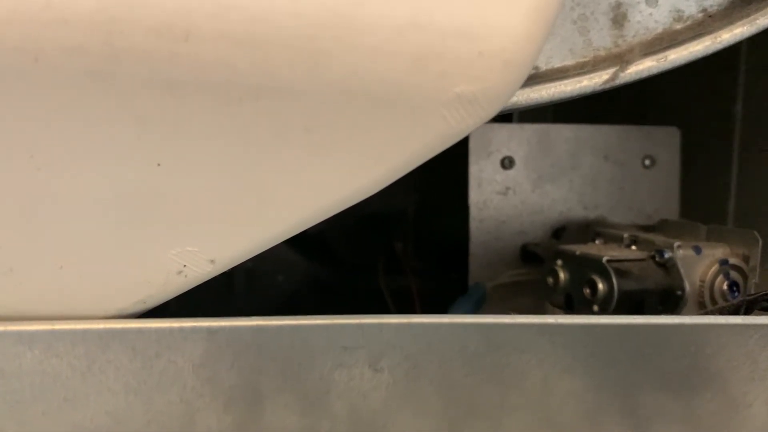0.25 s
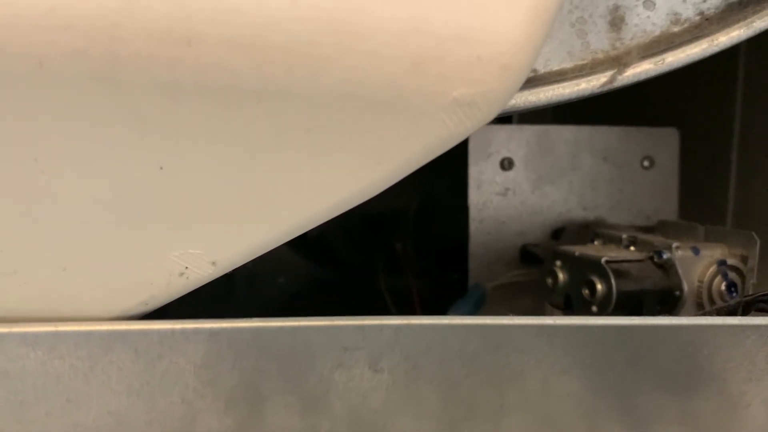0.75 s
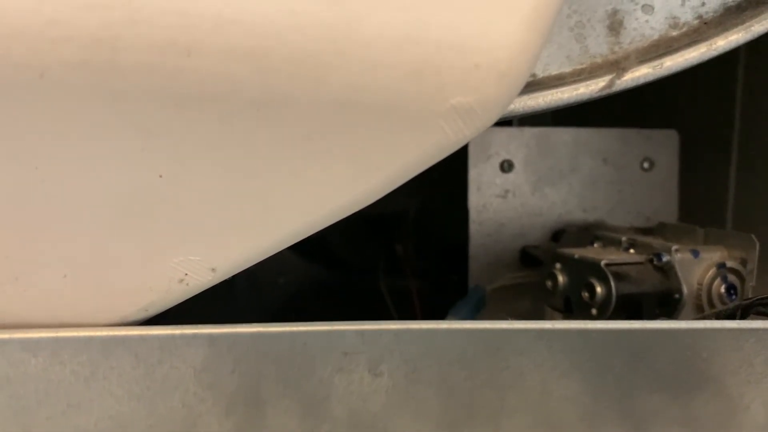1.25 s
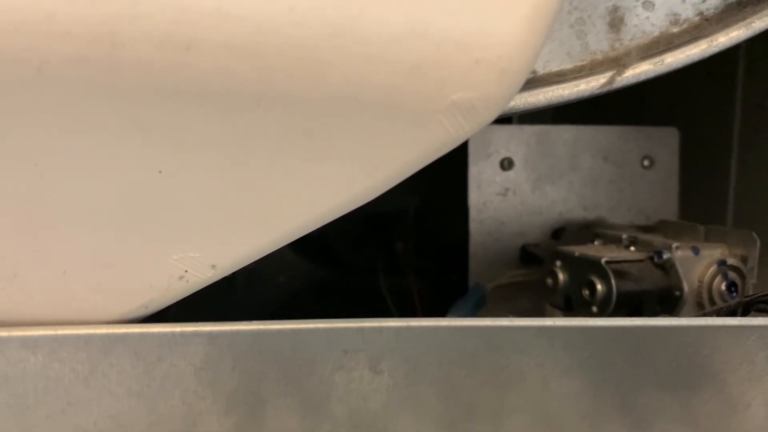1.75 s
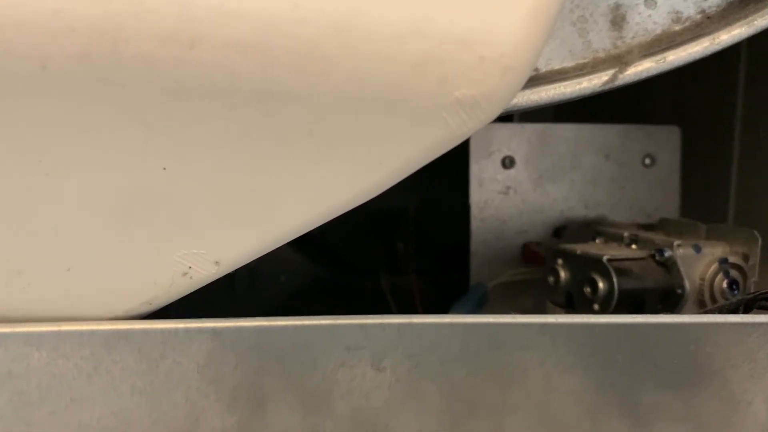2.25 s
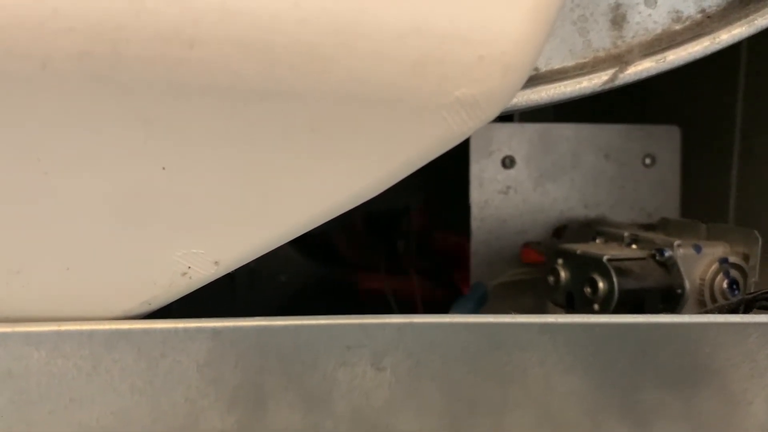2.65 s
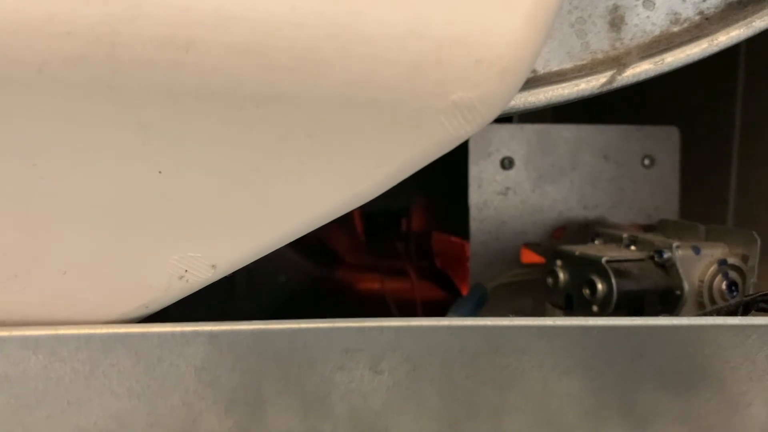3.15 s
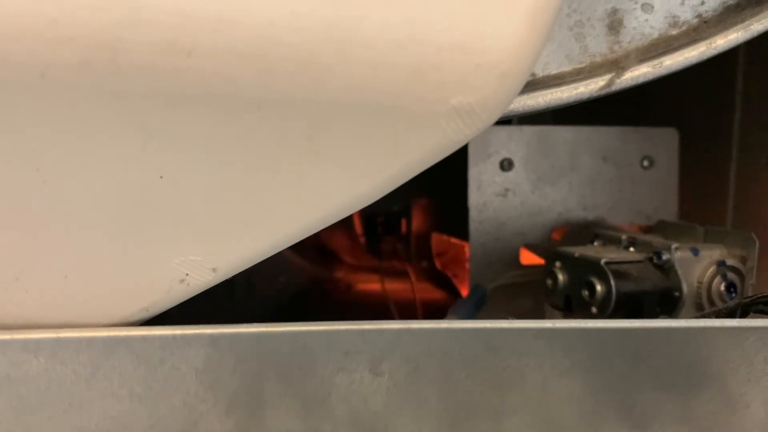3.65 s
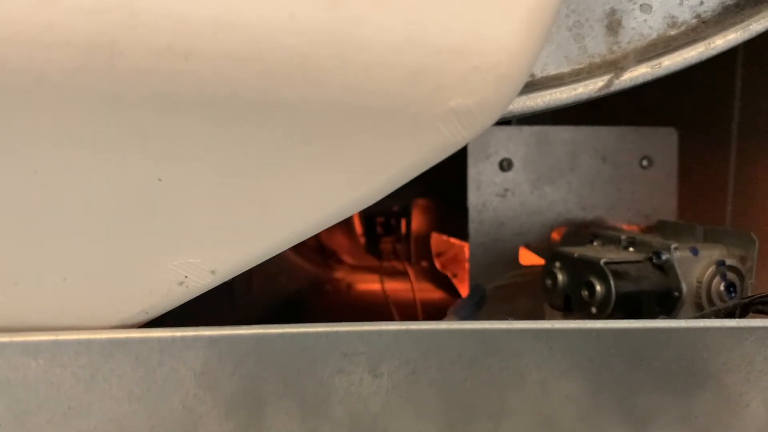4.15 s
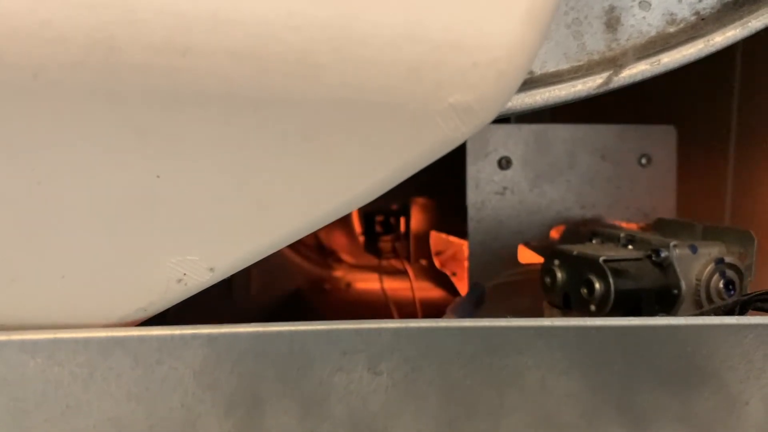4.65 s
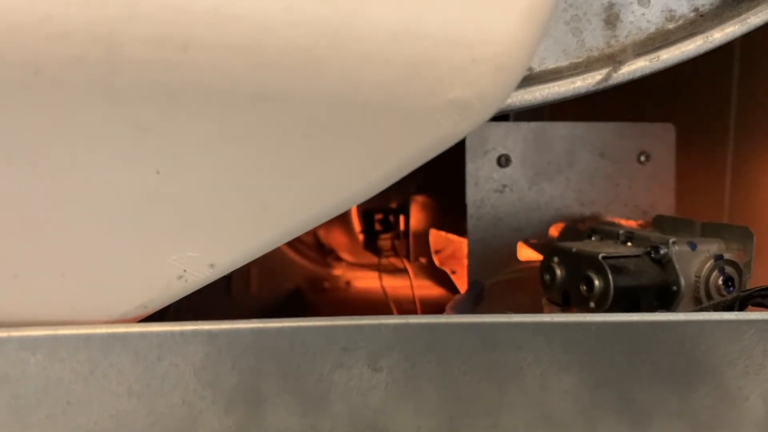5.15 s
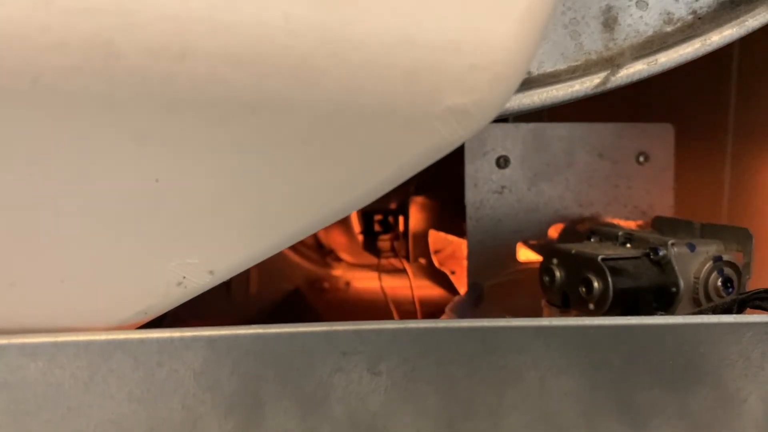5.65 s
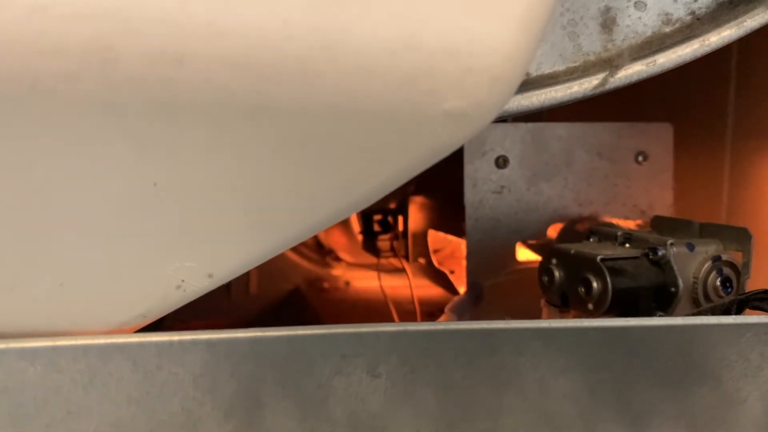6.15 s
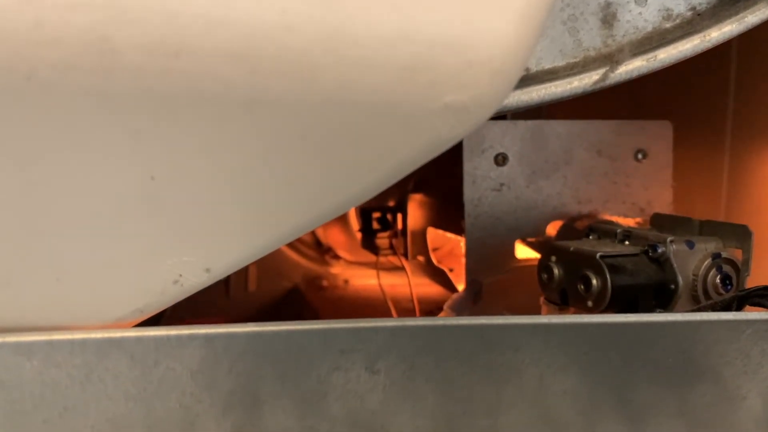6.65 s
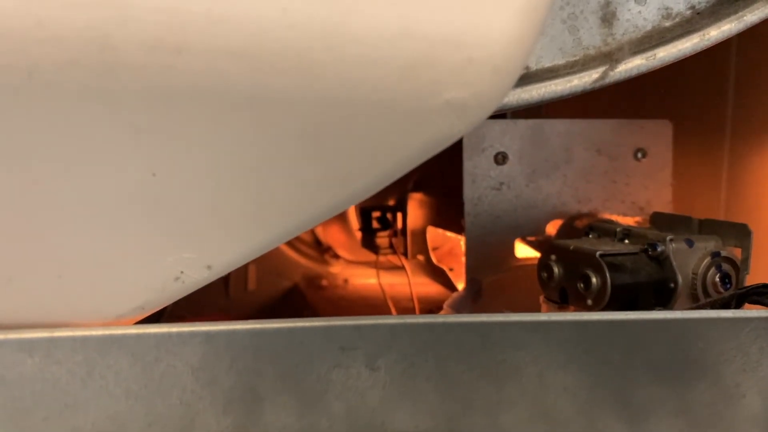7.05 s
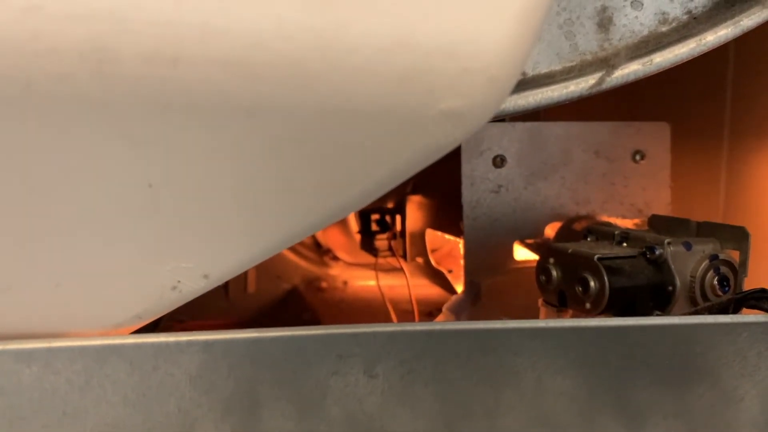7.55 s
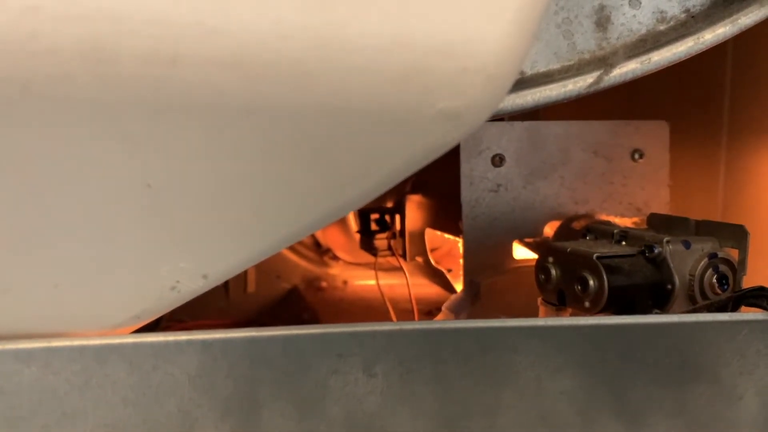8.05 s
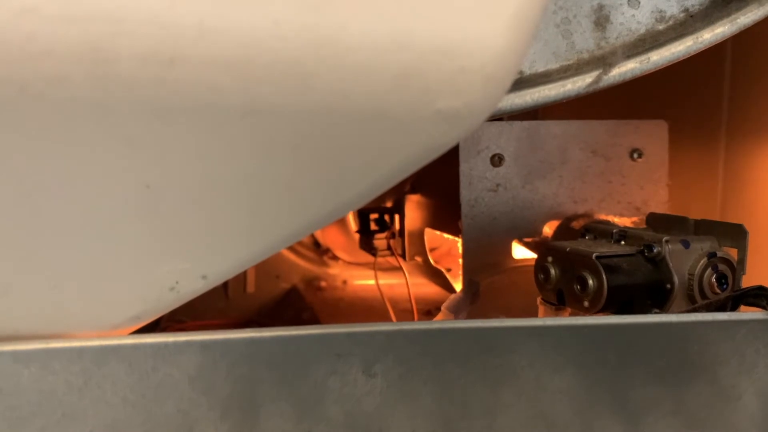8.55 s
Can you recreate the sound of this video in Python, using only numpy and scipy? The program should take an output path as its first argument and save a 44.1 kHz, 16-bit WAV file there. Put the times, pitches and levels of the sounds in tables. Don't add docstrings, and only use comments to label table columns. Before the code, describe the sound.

A dryer's motor hums and its air rushes steadily; near the start a hard click rings the sheet metal, later everything gets suddenly louder.

```python
import sys
import numpy as np
from scipy import signal
from scipy.fft import rfft, irfft, next_fast_len
from scipy.io import wavfile
from scipy.ndimage import uniform_filter1d, map_coordinates

SR = 44100
rng = np.random.default_rng(int(sys.argv[2]) if len(sys.argv) > 2 else 0)


def how_loud(loudness_db):
    steps = np.asarray(loudness_db, float) / 20
    return 10 ** steps


def digitize_waveform(pressure):
    field = np.atleast_2d(pressure).T
    bounded = np.clip(field, -1, 1)
    quanta = np.round(bounded * 32767).astype(np.int16)
    wavfile.write(sys.argv[1], SR, quanta)


N = 388950
TIME_S = np.arange(N) / SR
PULL_HZ, SHAFT_HZ, POLES = 119.855, 29.2564, 4
IN_STEP_S = 4.765
DUCK_START_S, DUCK_FALL_S, DUCK_HOLD_S = 0.728, 0.041, 0.092


def along(points, hz):
    point_hz, value = np.transpose(points)
    return np.interp(np.log(hz + 1), np.log(point_hz + 1), value)


def unit(x):
    return x / np.sqrt(np.mean(x ** 2) + 1e-20)


def wobble(knots_per_s):
    knots = rng.standard_normal(int(N * knots_per_s / SR) + 4)
    return map_coordinates(knots, [np.arange(N) * knots_per_s / SR], order=1)


def filtered(x, response):
    n = x.shape[-1]
    size = next_fast_len(n + 8192)
    return irfft(rfft(x, size) * response(np.fft.rfftfreq(size, 1 / SR)), size)[..., :n]


def resonances(modes, hz):
    total = 0
    for k, (center, width, db) in enumerate(modes):
        damping = 1j * hz * width
        total = total + (-1) ** k * how_loud(db) * damping / (center * center - hz * hz + damping)
    return total


def lifted(modes, hz):
    return np.sqrt(1 + sum(abs(resonances([mode], hz)) ** 2 for mode in modes))


def ducked(recover_s):
    corners_s = DUCK_START_S + np.cumsum([0, DUCK_FALL_S, DUCK_HOLD_S, recover_s])
    return np.interp(TIME_S, corners_s, [0, 1, 1, 0])


# frequency in Hz, likeness 0-1.
MIC_LIKENESS = [(30, .88), (60, .92), (230, .9), (300, .6), (370, .5), (550, .9), (680, .6), (850, .15),
                (1250, .15), (1600, .55), (2300, .2), (3200, .03), (6500, .3), (8200, .97)]
# frequency in Hz, left over right in dB.
MIC_BALANCE = [(30, 2.5), (60, 1.5), (230, 2), (400, 7), (540, 8), (650, 4), (1000, 1), (3500, 0),
               (6000, -3), (8000, 0)]
# frequency in Hz, left lead in rad. Above 7 kHz it climbs in steps, so
CHANNEL_LEAD = [(250, .2), (450, .8), (650, 1.5), (1200, 3.3), (2100, 5.5), (7000, 12.4), (7500, 14.1),
                (8300, 15.3), (8900, 16.1), (10600, 18.5), (11500, 19.2), (12800, 21.5), (14200, 22.4),
                (15600, 25.1)]


def microphones(pair, extra_likeness=0):
    def shared_and_apart(hz):
        turn = np.arccos(np.clip(along(MIC_LIKENESS, hz) + extra_likeness, 0, 1)) / 2
        return np.array([np.cos(turn), np.sin(turn)])

    def left_and_right(hz):
        half = how_loud(along(MIC_BALANCE, hz) / 2) * np.exp(0.5j * along(CHANNEL_LEAD, hz))
        return np.array([half, 1 / half])

    shared, apart = filtered(pair, shared_and_apart)
    return filtered(np.array([shared + apart, shared - apart]), left_and_right)


def tones(rows, starts, unsteady_db, drift_rad):
    out = np.zeros((2, N))
    for (hz, left_db, right_db, lead), start in zip(rows, starts):
        phase = 2 * np.pi * (hz * (TIME_S - IN_STEP_S) + start)
        wave = how_loud(unsteady_db * wobble(5)) * np.exp(1j * (phase + drift_rad * wobble(4)))
        sides = np.array([[how_loud(left_db) * np.exp(1j * lead)], [how_loud(right_db)]])
        out += np.sqrt(2) * np.real(wave * sides)
    return out


# multiple of the magnetic pull, shaft turns added, left dB, right dB, left lead in rad.
MOTOR_HUM = [(1, 0, -37, -38, 0.2), (1, 1, -53, -57, 0.4), (1, 5, -68, -69, 0.3), (2, -1, -56, -57, 0.1),
             (2, 0, -49, -49, -1.2), (2, 1, -61, -65, -0.4), (2, 2, -66, -65, -0.2), (3, -1, -53, -54, 0.2),
             (3, 0, -58, -49, 2.7), (3, 1, -55, -66, -2.4), (3, 2, -69, -76, 0.3), (4, -1, -62, -63, 0.3),
             (4, 0, -56, -66, 2.0), (4, 1, -63, -69, 1.5), (5, 0, -50, -56, 1.1), (5, 1, -68, -68, 1.1),
             (5, 2, -75, -78, 1.2)]
# multiple of the magnetic pull, shaft turns added, left dB, right dB, left lead in rad.
MOTOR_WHINE = [(7, -1, -78, -65, 3.0), (7, 1, -65, -83, 2.7), (8, -1, -78, -76, -0.9),
               (8, 0, -75, -79, 2.5), (8, 1, -74, -79, 0.2), (9, 0, -79, -73, -0.1), (9, 1, -81, -79, 1.2),
               (10, -1, -66, -70, 2.9), (10, 1, -69, -79, -3.1), (10, 2, -79, -76, -1.7),
               (11, -1, -75, -78, -1.3), (11, 1, -76, -82, 2.1), (12, -1, -71, -84, 0.0),
               (12, 1, -75, -71, -2.5), (13, -1, -73, -77, -2.5), (13, 1, -67, -69, -3.0),
               (14, -1, -70, -71, -1.7), (14, 0, -76, -78, -1.6), (15, -1, -78, -79, -1.5),
               (16, -1, -84, -81, 1.5), (17, -1, -84, -84, -0.4), (17, 1, -73, -74, -1.2),
               (18, -1, -83, -89, -0.4), (18, 1, -80, -85, -0.6)]
# multiple of the magnetic pull, shaft turns added, left dB, right dB, left lead in rad.
SHAFT_ORDERS = [(0, 1, -73, -76, -0.6), (0, 2, -56, -63, -0.1), (0, 4, -51, -55, 0.2),
                (0, 5, -59, -64, -0.1), (0, 6, -56, -63, 0.0), (0, 8, -58, -61, 0.4),
                (0, 10, -61, -67, 1.0), (0, 11, -65, -88, -0.4), (0, 22, -70, -72, 0.6),
                (0, 24, -77, -73, 2.0), (0, 25, -61, -78, 3.1), (0, 44, -75, -77, 1.0),
                (1, 44, -79, -70, 3.0), (2, 44, -80, -77, -1.4), (3, 44, -78, -78, -1.0),
                (4, 44, -84, -83, -1.2)]


def motor():
    lines = MOTOR_HUM + MOTOR_WHINE + SHAFT_ORDERS
    rows = [(m * PULL_HZ + n * SHAFT_HZ, left, right, lead) for m, n, left, right, lead in lines]
    place = rng.random(N // SR * 20)
    starts = [place[POLES * m + n] for m, n, *_ in lines]
    sag_db = -5 * ducked(recover_s=0.13)
    return how_loud(-0.5 + sag_db) * tones(rows, starts, unsteady_db=1.4, drift_rad=0.14)


# frequency in Hz, left dB, right dB, left lead in rad.
ROLLER_TONES = [(238.16, -60, -63, 0), (405, -59, -70, -.3)]


def rollers():
    starts = rng.random(len(ROLLER_TONES))
    return how_loud(1.5) * tones(ROLLER_TONES, starts, unsteady_db=2.5, drift_rad=0.52)


# start in seconds, peak in dB, dullness 0-1.
RELAY_CONTACTS = [
    (0.698, -28.5, 0),
    (0.7, -30, 0),
    (0.7074, -25.5, 0.46),
    (0.7114, -21, 0.15),
    (.7135, -23.5, 0.37),
    (0.7151, -15, 0.76),
    (0.7173, -18.5, 0.74),
    (0.726, -32, 0.4),
    (0.731, -31, 0.8),
    (0.74, -31, 0.6),
]
# frequency in Hz, width in Hz, level in dB.
RELAY_FRAME = [(1140, 850, -18), (1720, 200, -7.5), (2340, 170, -6), (3190, 130, 2), (3990, 135, 6.5),
               (4730, 400, -7), (5500, 420, -6), (6440, 300, -3), (7100, 530, -4), (8200, 290, 4.5),
               (9500, 1200, -5), (12300, 1800, -10), (14900, 1100, -8)]
# frequency in Hz, t60 in seconds.
PANEL_T60 = [(1000, 2.6), (2500, 1.6), (3500, 1.8), (5000, 0.9), (7200, 1.15), (9000, 0.46), (15000, 0.11)]


def relay():
    blows = np.zeros((2, 2 * SR))
    t = np.arange(SR // 10) / SR
    decay = how_loud(-1.5 - 60 * t / 0.012) + how_loud(-13 - 60 * t / 0.23)
    for start_s, db, dull in RELAY_CONTACTS:
        crack = rng.standard_normal((2, len(t))) * decay
        crack[0, 0] = how_loud(14)
        soft = signal.lfilter(np.multiply(1 - dull, [1, 0.54 * (dull - 1)]), [1, -dull], crack)
        first = round(start_s * SR)
        blows[:, first:first + len(t)] += how_loud(db) * soft

    hz, t, z = signal.stft(rng.standard_normal((2, SR)), SR, nperseg=256)
    tail = signal.istft(z * how_loud(-60 * t / along(PANEL_T60, hz)[:, None]), SR, nperseg=256)[1]
    ring = signal.fftconvolve(blows, tail / np.linalg.norm(tail[0]), axes=1)[:, :2 * SR]

    def panel_response(hz):
        high_pass = (hz / (hz - 1300j)) ** 2
        return how_loud(-22) * resonances(RELAY_FRAME, hz) + how_loud(-4) * high_pass

    frame = filtered(blows, lambda hz: resonances(RELAY_FRAME, hz))
    panels = filtered(ring, panel_response)
    snap = microphones(how_loud(12.5) * frame + how_loud(-3.5) * panels, extra_likeness=0.18)
    return np.pad(snap, ((0, 0), (0, N - 2 * SR)))


# frequency in Hz, level in dB, t60 in seconds.
BRACKET_MODES = [(1685, -2, 0.79), (3090, -7, 1.6), (3130, -2, 1.4), (3320, -10, 0.78), (3887, -4, 1.4),
                 (3980, -3.5, 1.65), (4040, -4, 1.4), (4517, -8, .9), (5394, -6, .8), (6330, -8, .7),
                 (6850, -7, 0.98), (6950, -9, 0.91), (7100, -5, .8), (7950, -3, 0.75)]


def bracket():
    t = TIME_S - 0.7125
    after = np.clip(t, 0, None)
    out = np.zeros((2, N))
    for hz, db, t60 in BRACKET_MODES:
        phase = 2 * np.pi * (hz * t + rng.random((2, 1))) + 1.5 * wobble(45)
        out += how_loud(db - 60 * after / t60 + 5.1 * wobble(12.3)) * np.sin(phase)
    swell = 1 - np.exp(-after / 0.077)
    return how_loud(-45) * out * swell


def air(patchy_db):
    z = signal.stft(rng.standard_normal((2, N)), nperseg=512)[2]
    patches = uniform_filter1d(rng.standard_normal(z.shape[1:]), size=8, axis=0)
    patches = uniform_filter1d(patches, size=14, axis=1)
    return signal.istft(z * how_loud(patchy_db * unit(patches)), nperseg=512)[1][:, :N]


# frequency in Hz, level in dB per Hz.
RUMBLE_SHAPE = [(15, -30), (25, -12), (38, -4.5), (60, 0), (110, 4), (180, -1), (235, 1), (260, -5.5),
                (400, -12), (630, -10), (680, -12), (900, -15), (1300, -50)]
# frequency in Hz, width in Hz, level in dB.
CABINET_CAVITIES = [(68.6, 11, -2), (182, 17, 5), (282, 9.9, 2.5), (347, 22.6, 11.5), (416.5, 4.8, 10.5),
                    (456.7, 13, 13), (528, 37, 10), (574.3, 14, 10), (615, 7.5, 0)]
# frequency in Hz, level in dB per Hz.
HISS_SHAPE = [(500, -19), (900, 0), (1300, 4), (1720, -5.5), (1900, -4.5), (2600, -5), (2900, -7),
              (4000, -7.5), (5500, -13.5), (7300, -18.5), (8500, -16.5), (11000, -26.5), (13500, -25),
              (15500, -53)]
# frequency in Hz, width in Hz, level in dB.
DUCT_MODES = [(852, 18, 9.5), (983, 8, 7.5), (1399, 7.4, 9.5), (1555, 6.7, 11.5), (1709, 100, 10),
              (2070, 20, 4.5), (2466, 57, 1), (3400, 150, -6)]


def blower():
    rumble = filtered(air(patchy_db=0.6),
                      lambda hz: how_loud(along(RUMBLE_SHAPE, hz)) * lifted(CABINET_CAVITIES, hz))
    hiss = filtered(air(patchy_db=1.25),
                    lambda hz: how_loud(along(HISS_SHAPE, hz)) * lifted(DUCT_MODES, hz))
    throb = 1 + 0.055 * np.sin(2 * np.pi * SHAFT_HZ * TIME_S)
    roar = how_loud(-41 + 0.14 * wobble(2.9)) * unit(rumble)
    return microphones(roar + how_loud(-55 + 0.19 * wobble(2.87)) * throb * unit(hiss))


def scene():
    return motor() + rollers() + relay() + bracket() + blower()


def gain_db():
    rest_db, duck_db, step_db, step_s = -0.8, -3.5, 4.5, 6.081
    return rest_db + duck_db * ducked(recover_s=0.037) + step_db * (TIME_S > step_s)


def band_limit(x):
    return signal.sosfilt(signal.butter(12, 16680, fs=SR, output="sos"), x)


def record(dry):
    top_hz = 15750
    mix = filtered(dry * how_loud(gain_db()), lambda hz: hz < top_hz)
    return band_limit(mix)


dry = scene()
out = record(dry)
digitize_waveform(out)
```